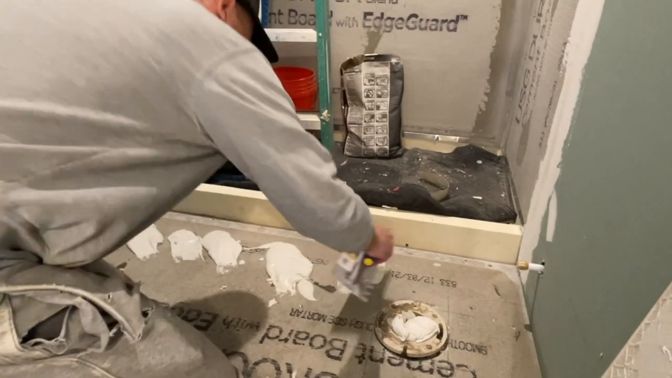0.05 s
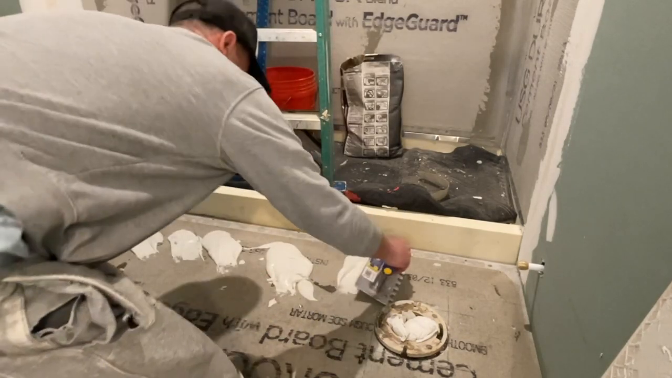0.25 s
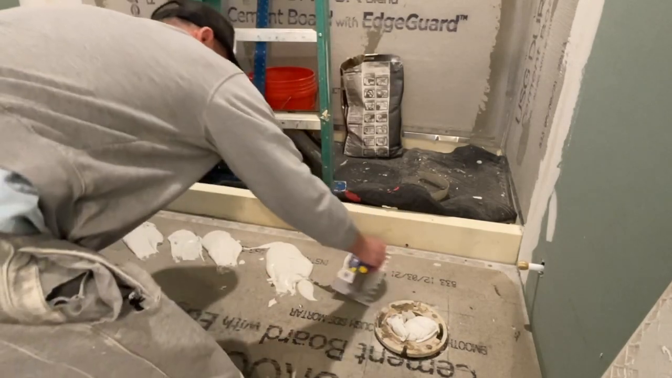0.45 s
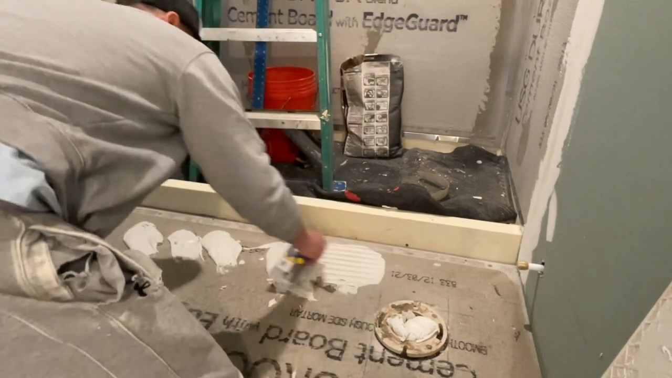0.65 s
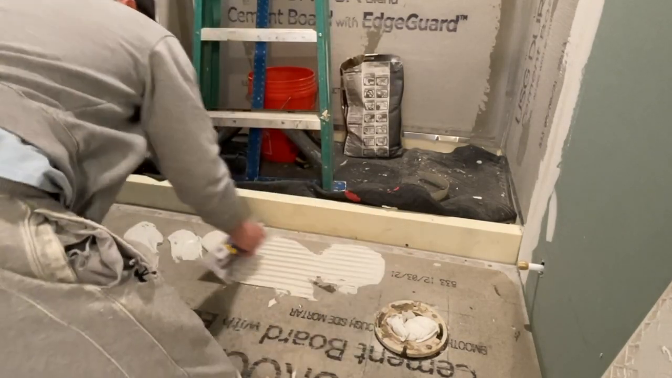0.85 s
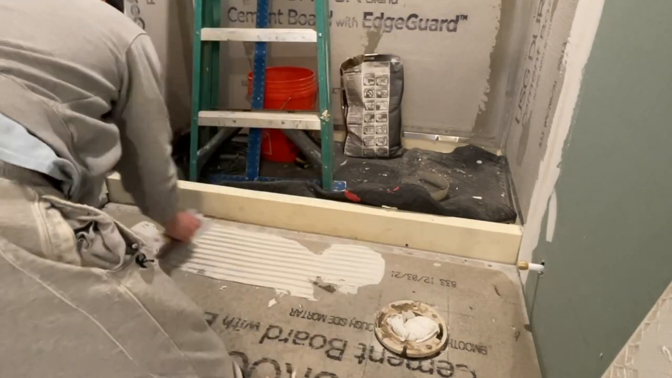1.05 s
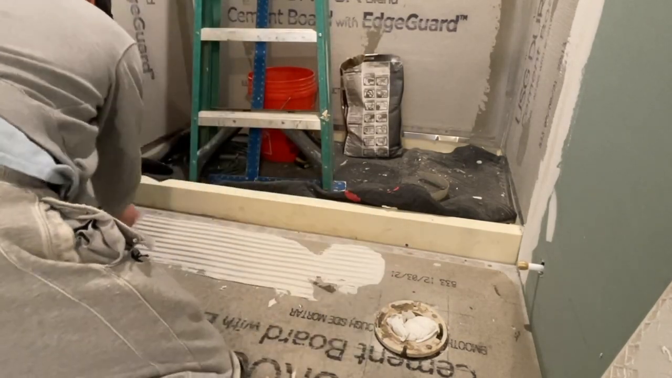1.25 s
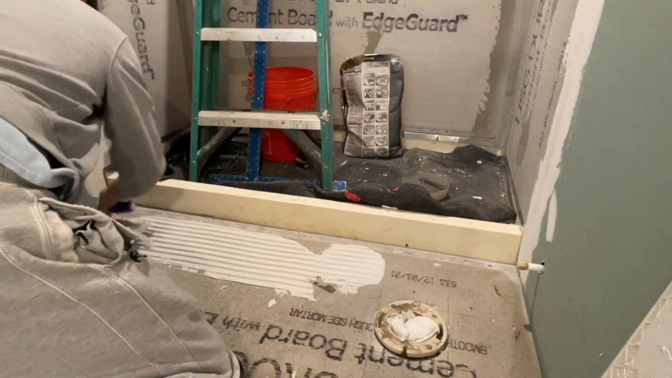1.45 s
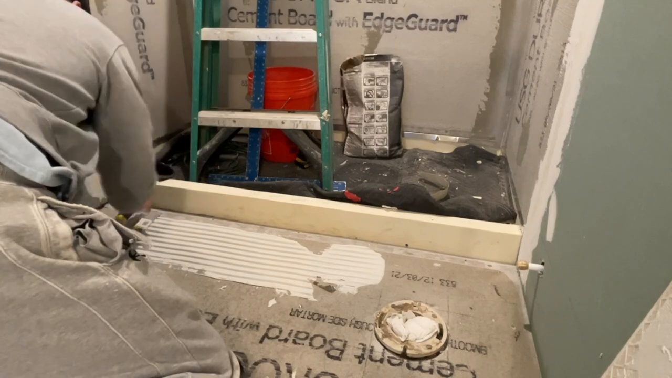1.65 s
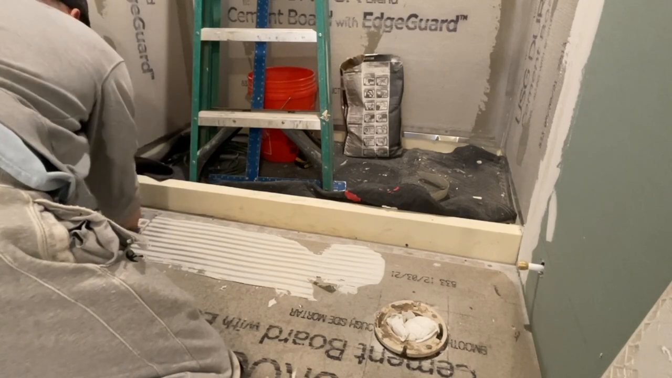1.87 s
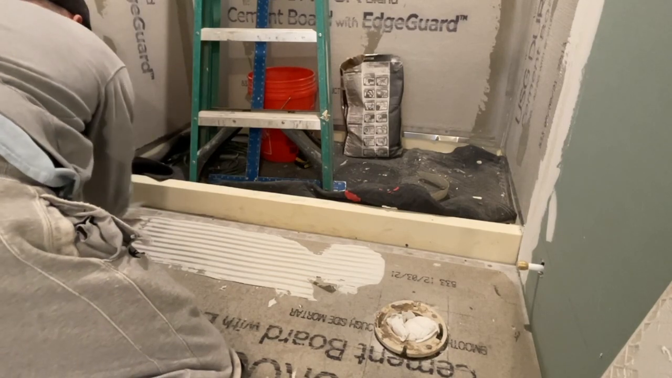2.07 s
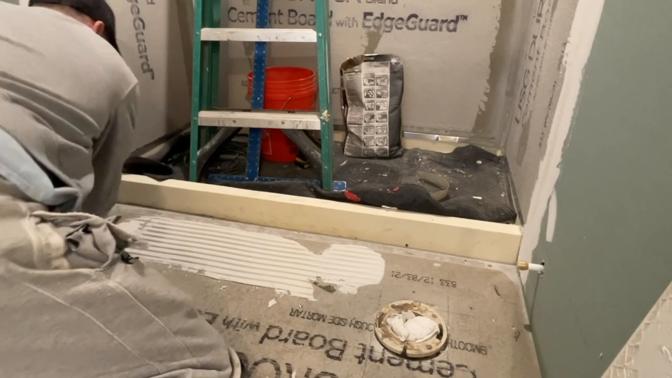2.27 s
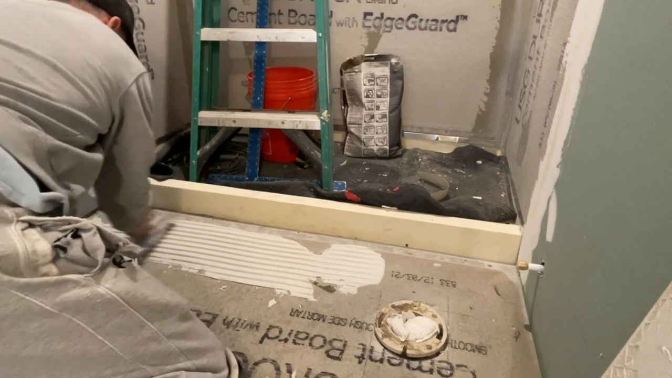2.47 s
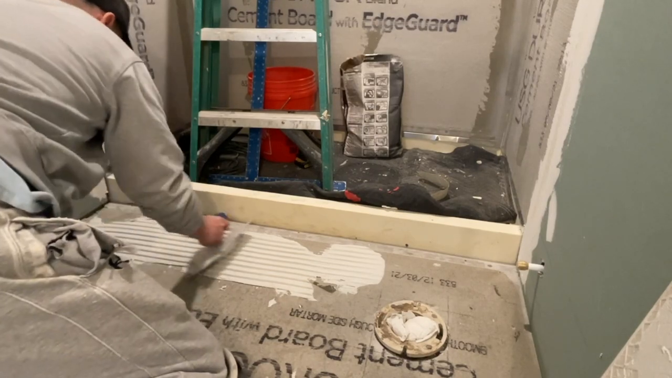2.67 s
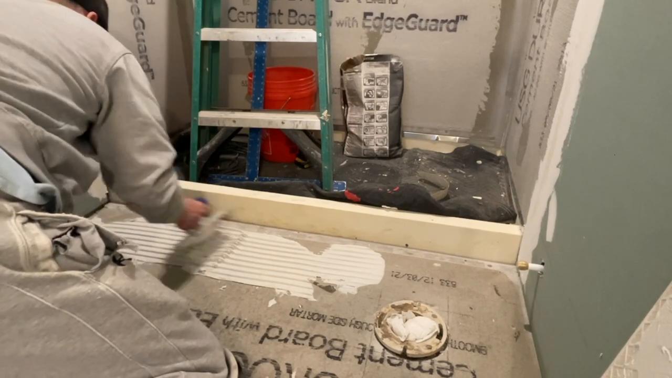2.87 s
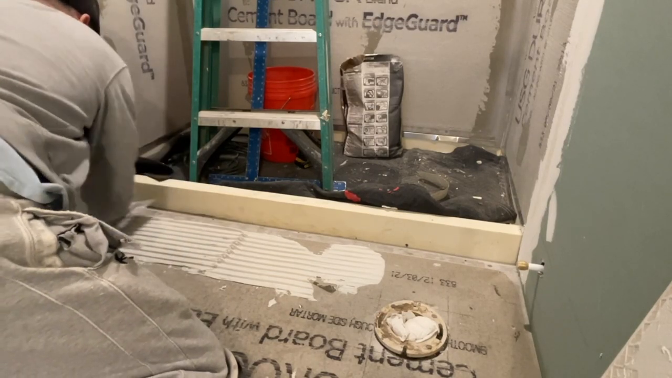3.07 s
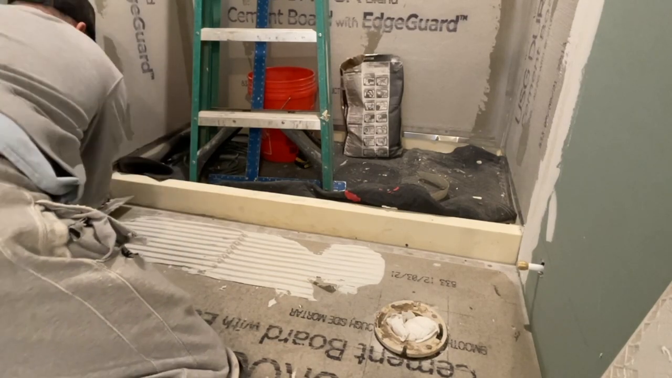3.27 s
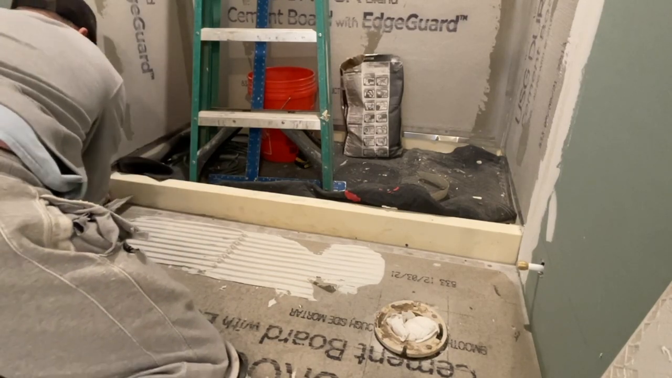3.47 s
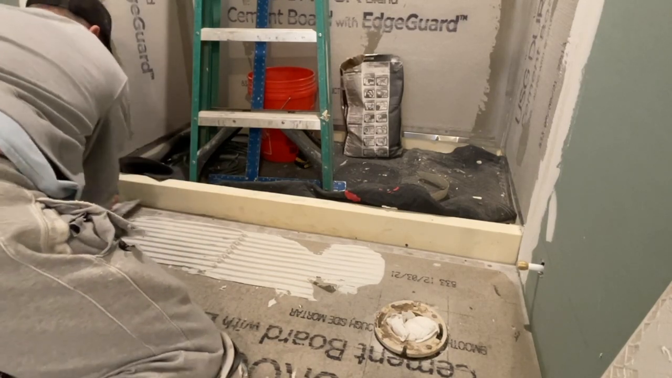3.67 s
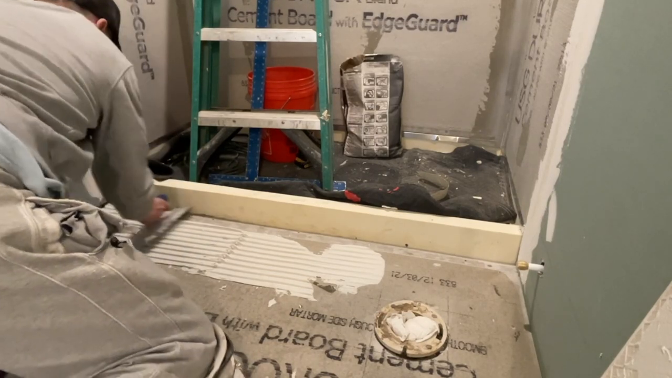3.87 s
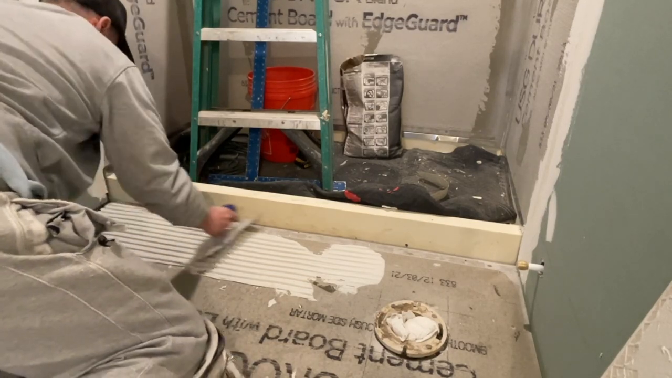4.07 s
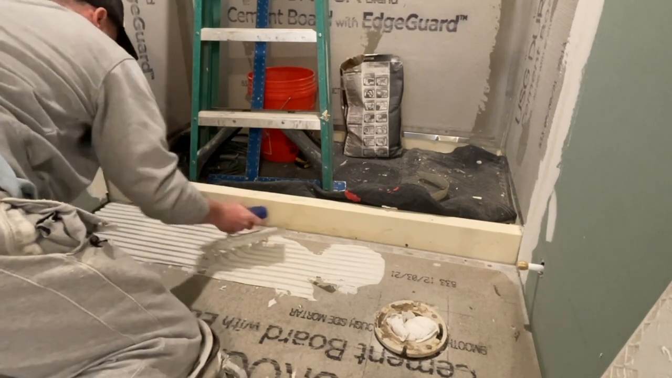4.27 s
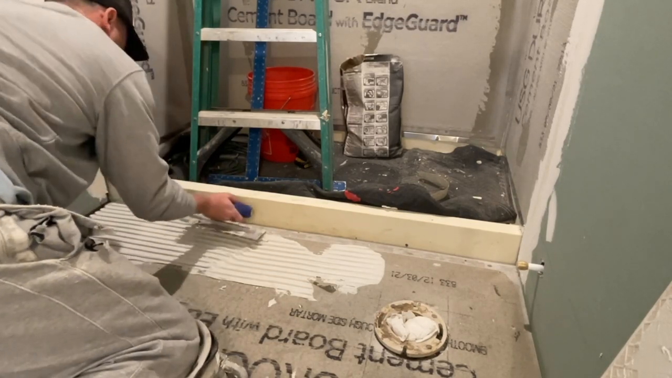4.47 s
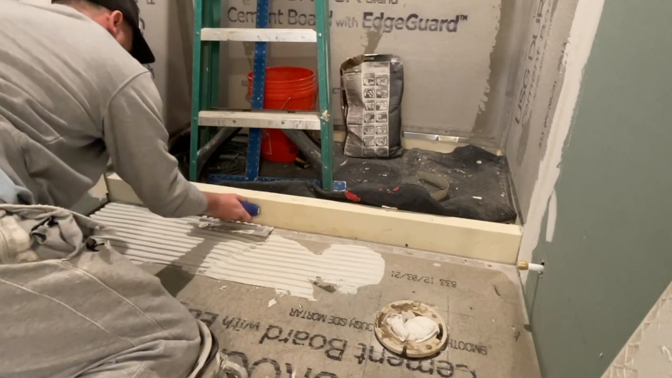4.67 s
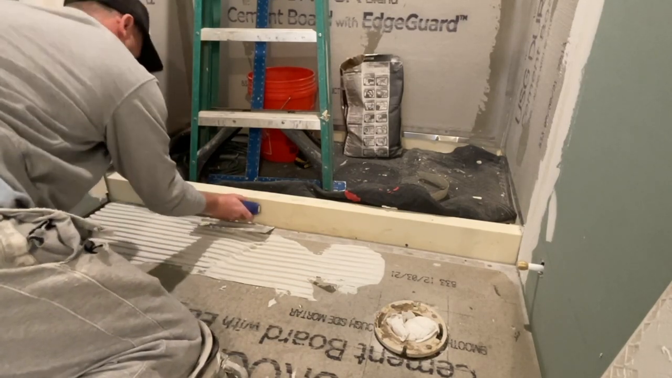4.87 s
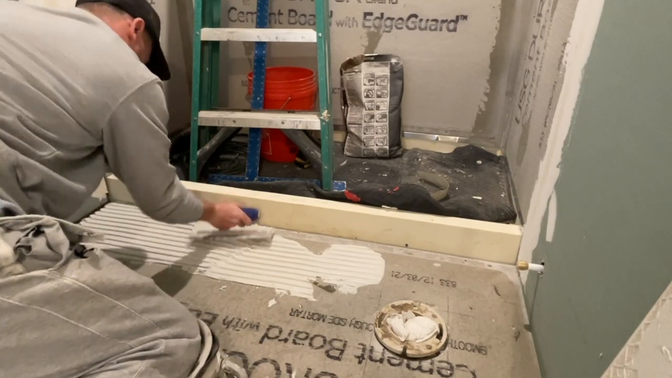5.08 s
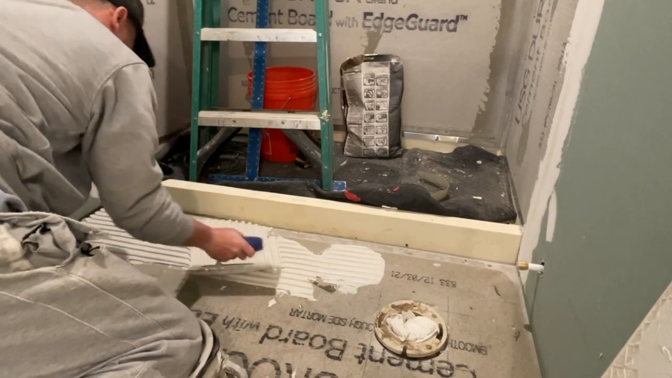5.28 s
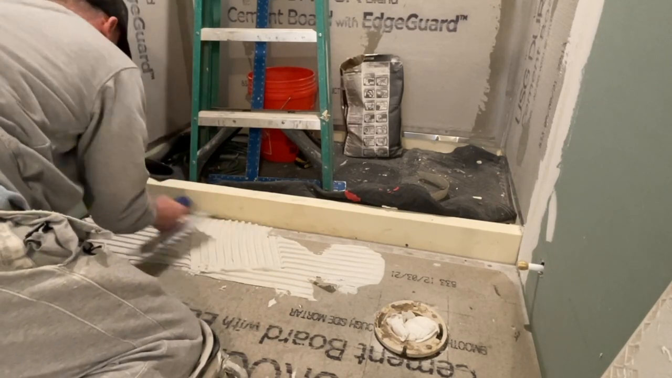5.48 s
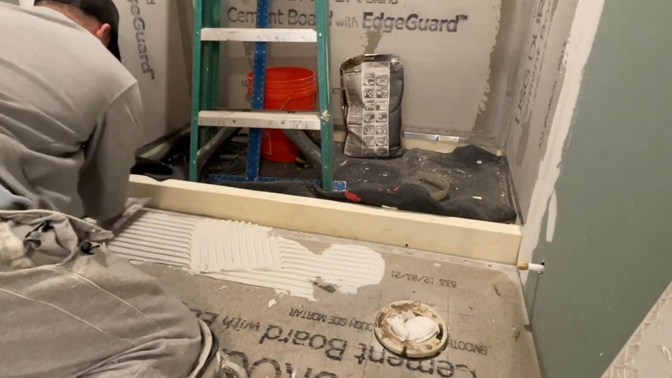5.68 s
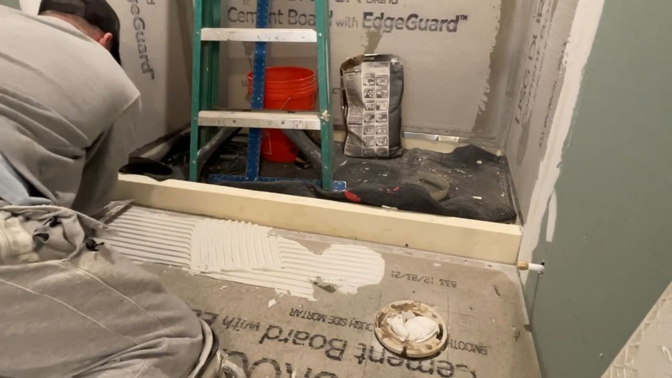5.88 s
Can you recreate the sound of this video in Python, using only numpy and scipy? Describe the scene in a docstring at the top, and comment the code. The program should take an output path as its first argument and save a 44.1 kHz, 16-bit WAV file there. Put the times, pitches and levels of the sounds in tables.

```python
"""In a small bare room, a notched steel trowel combs thick mortar over a cement board floor in five pulls.
Random catches drive the blade's rasp and ring, a bright sandy crunch and the rumble of dragged paste.
Knocks are short bursts through the same filters, thuds are sinking low tones; soft noise swells between.
A floor boom, faint air and a low drone lie beneath; the room adds its echoes."""
import sys
import numpy as np
from scipy import signal
from scipy.fft import rfft, irfft, next_fast_len
from scipy.io import wavfile
from scipy.ndimage import uniform_filter1d

SR = 44100
rng = np.random.default_rng(int(sys.argv[2]) if len(sys.argv) > 2 else 0)


def pcm_store(signal):
    """Save signal as 16-bit PCM."""
    levels = np.round(np.clip(np.atleast_2d(signal), -1, 1) * 32767)
    wavfile.write(sys.argv[1], SR, levels.astype(np.int16).T)


N = 261513
T = np.arange(N) / SR

SPEED_LAW = 0.68  # sand loudness grows as this power of the speed
TIRING_DB_PER_S = 5  # the judder eases once the pull is steady
HEEL_LAG_S = 0.026  # the blade judders on after the teeth have left the sand
SAG_SHARE = 0.031  # the blade's pitch falls by this share over a pull
SAND_CATCH = 0.59  # share of each catch that reaches the sand
SURGE_DB = 0.07  # spread of the judder's short surges
# Pulls of the trowel: (start [s], speeding up [s], steady [s], lifting [s], relative judder level [dB],
# relative sand level [dB], relative paste level [dB], singing pitch [Hz], hollow pitch [Hz],
# hollow level against judder [dB], power of the speed by which judder and paste grow)
PULLS = [(.285, .25, 0.67, 0.072, -22, -22, -36.5, 1300, 681, -11.5, 1),
         (2.26, .35, 0.073, 0.052, -21.5, -21, -35.5, 1350, 630, -14, 0.76),
         (3.565, 0.51, .024, 0.048, -22.5, -20.5, -33.5, 1230, 747, -16, .65),
         (4.966, 0.061, 0.065, 0.064, -38, -34.5, -44.5, 1160, 700, -6, 1.1),
         (5.15, 0.047, .018, 0.056, -29.5, -27, -43, 1257, 705, -11.5, .7)]


def strokes(singing_db=-14, singing_width_hz=210, hollow_width_hz=170, waver=0.028, patchy_db=2.8):
    """The teeth catch and slip; each catch drives blade, sand and paste together during a pull."""
    catch_db = 0.95 * walk(rate=150)
    surge_db = 1.5 * catch_db + SURGE_DB * walk(rate=45)
    judder = unit(steel(grains(rate=2400, spread_db=1.0) * undb(surge_db), ring_db=3.0))
    sand = unit(grit(grains(rate=9000, spread_db=1.5) * undb(SAND_CATCH * catch_db)))
    paste = unit(mortar(grains(rate=1200, spread_db=0.0) * undb(catch_db)))
    slips = grains(rate=2400, spread_db=0.5) * undb(catch_db)
    flex = 1 + waver * walk(rate=19)
    patches = undb(patchy_db * walk(rate=18))
    out = heaps(paste) + chatter(slips)
    for (start, rise, hold, lift, judder_db, sand_db, paste_db,
         sing_hz, hollow_hz, hollow_db, bite) in PULLS:
        pull = span(start, start + rise + hold + 4 * lift)
        age = T[pull] - start
        speed = np.clip(age / rise, 0, 1)
        contact = release(age - rise - hold, lift)
        teeth = speed ** SPEED_LAW * contact
        drag = speed ** bite * np.sqrt(contact)
        tiring = undb(-TIRING_DB_PER_S * np.maximum(age - rise, 0))
        heel = speed ** bite * release(age - rise - hold - HEEL_LAG_S, lift) * tiring
        # both bending notes glide together as pressure and paste load the blade
        load = flex[pull] * (1 - SAG_SHARE * np.minimum(age / (rise + hold), 1))
        singing = undb(singing_db) * bending(slips[pull], sing_hz * load, singing_width_hz)
        hollow = undb(hollow_db) * bending(slips[pull], hollow_hz * load, hollow_width_hz)
        blade = judder[pull] + patches[pull] * (singing + hollow)
        out[pull] += heel * undb(judder_db) * blade
        out[pull] += teeth * undb(sand_db) * sand[pull]
        out[pull] += drag * undb(paste_db) * paste[pull]
    return out


# The broad rasp of the blade: (frequency [Hz], relative level [dB])
RASP = [(200, -35.5), (420, -7), (620, 3.5), (800, -1), (1000, 2), (1600, 2.5), (2400, -7.5), (3500, -11.5),
        (6000, -32.5)]
# Blade notes, damped by paste: (frequency [Hz], width [Hz], relative level [dB])
BLADE_NOTES = [(720, 380, -8.5), (917, 69, -9), (1160, 180, -0.5), (1393, 36, -4.5), (1610, 200, -9.5),
               (1790, 290, -3.5), (2170, 290, -11.5)]


def steel(push, ring_db=8):
    """The blade's voice: a broad rasp and its bending resonances."""
    return colour(push, RASP) + undb(ring_db) * ring(push, BLADE_NOTES)


# Bright crunch as picked up, with dips near 5.6, 7.5 and 10.7 kHz: (frequency [Hz], relative level [dB])
PICKED_UP_CRUNCH = [(800, -18.5), (2000, -13.5), (3600, 0), (5100, 0), (5600, -7), (6050, 0.5), (6950, -1),
                    (7450, -7.5), (8100, -1.5), (9200, -1), (10700, -7), (11800, 1.5), (13200, 2),
                    (15500, -9.5)]
# High rings of the steel teeth: (frequency [Hz], width [Hz], relative level [dB])
TOOTH_NOTES = [(3340, 210, -6), (3920, 550, -2.5), (7050, 79, -7), (8080, 240, -4.5), (13800, 44, 0)]


def grit(push, ring_db=-3):
    """A bright crunch as picked up, with the teeth ringing in it."""
    return colour(push, PICKED_UP_CRUNCH) + undb(ring_db) * ring(push, TOOTH_NOTES)


# The low rumble of paste on the board: (frequency [Hz], relative level [dB])
PASTE_RUMBLE = [(30, -35), (55, -19.5), (75, -1), (105, -11), (160, 3.5), (215, -3), (272, 4), (330, -5),
                (400, 0.5), (600, -4.5), (900, -1), (1800, -31)]


def mortar(push):
    """Pushed paste rumbles in the board: a filter that favours the low range."""
    return colour(push, PASTE_RUMBLE)


# Heaps of paste in the way: (time [s], bell width [s], relative level [dB])
PASTE_HEAPS = [(0.498, 0.014, -37), (0.805, 0.066, -35), (1.226, 0.048, -31), (2.472, 0.031, -45.5),
               (2.685, 0.026, -42.5), (3.554, 0.086, -48), (3.873, 0.039, -33), (3.972, .016, -36.5),
               (5.229, 0.01, -41.5)]


def heaps(paste):
    """The teeth plough through heaps of paste: brief swells of the rumble."""
    return paste * sum(undb(db) * swell(s, width) for s, width, db in PASTE_HEAPS)


# Moments when the blade chatters and sings out:
# (time [s], bell width [s], relative level [dB], pitch [Hz], pitch width [Hz])
FLARES = [(0.38, .03, -34, 1292, 70.5), (0.505, .014, -30, 610, 152.4), (0.565, 0.027, -23, 1350, 332),
          (0.614, 0.018, -23, 1297, 90.8), (0.724, 0.032, -25.5, 492, 108.5), (0.815, .014, -23, 1713, 893),
          (0.816, .04, -29, 411, 136.5), (0.885, 0.019, -29, 750, 399), (0.888, 0.035, -22, 1196, 318),
          (0.945, 0.018, -26, 1237, 300), (1.223, 0.046, -31.5, 1290, 502),
          (2.402, 0.012, -29.5, 596, 140.6), (2.442, 0.022, -33.5, 1410, 500),
          (2.463, .012, -29.5, 600, 140), (2.552, 0.034, -30.5, 1280, 348), (2.617, 0.033, -31, 1740, 900),
          (2.628, .016, -25, 570, 80.5), (2.706, .018, -21.5, 1190, 224.6), (3.599, 0.011, -34, 563, 295.6),
          (3.713, 0.013, -30.5, 1194, 220), (3.868, 0.024, -25.5, 750, 800), (3.886, .06, -32.5, 1800, 900),
          (3.964, 0.011, -29.5, 620, 300), (4.07, 0.015, -23.5, 1190, 342),
          (4.136, 0.017, -22.5, 1750, 1000), (4.132, .02, -25, 740, 220), (4.148, 0.011, -27, 1180, 300),
          (5.067, 0.025, -40.5, 590, 500), (5.09, 0.021, -39.5, 1164, 348), (5.192, .051, -36.5, 3780, 530),
          (5.23, 0.022, -33.5, 1178, 300)]


def chatter(slips):
    """Short flares of the blade's bending notes, from a narrow note to a broad rasp."""
    out = np.zeros(N)
    for s, width, db, hz, width_hz in FLARES:
        near = span(s - 3 * width, s + 3 * width)
        note = bending(slips[near], np.full(len(T[near]), hz), width_hz)
        out[near] += undb(db) * swell(s, width)[near] * note
    return out


def bending(push, hz, width_hz):
    """A resonance whose pitch follows the flex of the blade."""
    turn = np.exp(2j * np.pi * np.cumsum(hz) / SR)
    # shift the pitch down to zero, keep a narrow band, then shift it back
    narrow = signal.butter(2, width_hz / 2, fs=SR, output="sos")
    return unit(np.real(turn * signal.sosfilt(narrow, push / turn)))


# A blade that lands hard rocks in the paste: each contact comes later, weaker and duller
ROCK_S, ROCK_SLOWING = .0068, 1.55  # first delay; power by which the delays grow
ROCK_LOSS_DB, ROCK_DULLING_DB = 1, 0.5  # per contact
# The blade knocks on the board:
# (time [s], relative level [dB], sharpness [dB], singing [dB], how long it may rock on [s])
BLADE_KNOCKS = [(0.199, -26, 5.5, -10, 0.0063), (0.2117, -16.5, 1.5, 3.5, .04), (0.23, -30, -4.5, 9.5, 0),
                (0.262, -31, -4, 8.5, 0), (2.206, -39, 3.5, -18, 0.027), (2.219, -26.5, 3.5, -13, .07),
                (3.433, -53.5, 4.5, -7, 0.006), (3.578, -40, -4.5, -15, 0), (4.607, -57, 2.5, -18.5, .01),
                (4.714, -55.5, 11, -18, 0.0072), (4.888, -48, -2.5, -5, 0.0076), (5.762, -56.5, 3, -12, 0)]


def knocks(crunch_s=0.0046, crack_s=0.0011, count=5):
    """Each knock crushes a little sand and rings the blade, which sings when it is free of paste."""
    push, crack, free = np.zeros((3, N))
    age = np.arange(SR // 20) / SR
    delays = ROCK_S * np.arange(count) ** ROCK_SLOWING
    for s, db, sharp_db, sing_db, rocking in BLADE_KNOCKS:
        for k, delay in enumerate(delays[delays <= abs(rocking)]):
            at = int((s + delay) * SR) + np.arange(len(age))
            size = undb(db - k * ROCK_LOSS_DB)
            blow = size * np.exp(-age / crunch_s)
            push[at] += blow
            free[at] += blow * undb(sing_db)
            crack[at] += size * undb(sharp_db - k * ROCK_DULLING_DB) * np.exp(-age / crack_s)
    push, crack, free = (force * rng.standard_normal(N) for force in (push, crack, free))
    body = undb(6.0) * steel(push, ring_db=2.5) + undb(12.5) * mortar(push)
    note = undb(26.0) * sing(free) + ring(free, [(706, 160, 14), (900, 110, 19), (3640, 160, 9.6)])
    return body + note + undb(4.5) * grit(crack)


# The free blade's main bending notes: (frequency [Hz], width [Hz], relative level [dB])
FREE_NOTES = [(1199, 58, 1.5), (1295, 70, -3), (1380, 27, -13.5)]


def sing(push):
    """The narrow metallic note of the free blade."""
    return ring(ring(push, FREE_NOTES), [(1270, 190, 0.0087)])


def after_ring(hz=1357, db=-64, t60=2.2):
    """A faint, fading steel note hangs in the air until the second knock."""
    return np.sin(2 * np.pi * hz * T) * undb(db - 60 * T / t60) * (T < BLADE_KNOCKS[1][0])


SNAP_ROOM_DB = -4  # how much of a snap is sent to the room
# A single grain of sand snaps under a tooth: (time [s], relative level [dB])
GRAIN_SNAPS = [(4.943, -33)]


def snaps(decay_s=.0012, low_hz=6000):
    """A grain breaks with a tiny, very bright crack: a short noise burst with the lows removed."""
    burst = sum(undb(db) * (T >= s) * np.exp(-abs(T - s) / decay_s) for s, db in GRAIN_SNAPS)
    bright = signal.butter(2, low_hz, "high", fs=SR, output="sos")
    return signal.sosfilt(bright, burst * rng.standard_normal(N))


# Soft thuds of paste and board:
# (time [s], relative level [dB], starting pitch [Hz], time to fade by 60 dB [s])
SOFT_THUDS = [(0.216, -25, 135, 0.14), (0.218, -25.5, 80.5, 0.2), (0.275, -28, 71, 0.31),
              (0.367, -33.5, 66, 0.24), (0.793, -31, 150, 0.077), (0.856, -26, 140, 0.16),
              (0.931, -31.5, 135, .14), (1.025, -29.5, 120, 0.12), (1.1, -29.5, 150, 0.16),
              (1.187, -27, 165, 0.12), (1.374, -27, 161.4, 0.2), (1.427, -32, 115, 0.11),
              (1.89, -42.5, 154.6, 0.25), (2.224, -32, 112, 0.15), (2.25, -35, 69.2, 0.36),
              (2.631, -30, 142.5, 0.12), (3.44, -41, 168.9, 0.13), (3.443, -44, 82, 0.27),
              (3.64, -35.5, 86, .25), (3.8, -28, 161.5, .2), (3.95, -37, 88, 0.24), (4.611, -44, 59, 0.092),
              (5.03, -48, 85, 0.33), (5.109, -46.5, 91, 0.33), (5.17, -33.5, 166, 0.51),
              (5.377, -36.5, 136, 0.082), (5.407, -29.5, 112, 0.048)]


def thuds(rise_s=0.0067, sag=0.32):
    """Low damped swings whose pitch sags as the pressure lets go; the paste makes them uneven."""
    out = np.zeros(N)
    t = np.arange(SR // 2) / SR
    for s, db, hz, t60 in SOFT_THUDS:
        tone = np.sin(2 * np.pi * hz * t * (1 - sag * t / 2))
        swing = tone * (1 - np.exp(-t / rise_s)) * undb(db - 60 * t / t60)
        start = int(s * SR)
        out[start:start + len(t)] += swing[:N - start]
    return out * undb(2.2 * walk(rate=120))


# Faint soft noise swells, some of them long and background-like:
# (time [s], relative level [dB], bell width [s], treble against dull part [dB])
FAINT_SWELLS = [(0.042, -68, 0.41, -0.5), (1.574, -63, 0.052, -10), (1.697, -62, 0.037, -16),
                (1.835, -68, 0.056, -7), (1.864, -83, 0.043, 13), (2.055, -72.5, 0.034, 3.5),
                (2.205, -53.5, 0.017, -10), (3.157, -67, 0.45, -5.5), (3.487, -48.5, 0.024, -3.5),
                (4.294, -46, 0.033, -23), (4.643, -70.5, 0.04, -5), (4.748, -56.5, 0.024, -2.5),
                (4.935, -54, 0.052, 6), (5.47, -68, 0.019, -2), (5.55, -76, 0.11, -16),
                (5.798, -71, 0.019, -0.5)]


def soft_swells(uneven_db=2.5):
    """Faint, uneven swells of noise, each mixed from a dull and a bright part."""
    dull = unit(steel(grains(rate=3300, spread_db=2.0), ring_db=-0.5))
    bright = unit(grit(grains(rate=2000, spread_db=1.0)))
    unevenness = undb(uneven_db * walk(rate=13))
    return unevenness * sum(undb(db) * swell(s, width) * (dull + undb(treble_db) * bright)
                            for s, db, width, treble_db in FAINT_SWELLS)


SHIFT_DB, SHIFT_S = -63, 0.15  # level, and bell width of each shift
# The floor's boom: (frequency [Hz], width [Hz], relative level [dB])
FLOOR_BOOM = [(77.6, 18, 0)]


def floor_rumble():
    """The floor booms faintly as weight shifts around the start and end of each pull."""
    shifts = sum(swell(start, SHIFT_S) + swell(start + rise + hold + SHIFT_S, SHIFT_S)
                 for start, rise, hold, *_ in PULLS)
    boom = unit(ring(ring(rng.standard_normal(N), FLOOR_BOOM), FLOOR_BOOM))
    return undb(SHIFT_DB) * np.minimum(shifts, 1) * boom


QUIET_DB = -68.5  # middle level of each part of the air
# The tone of the quiet indoor air: (frequency [Hz], relative level [dB])
AIR = [(15, -30), (25, -5), (75, 0.5), (267, 2), (368, -10), (552, -2), (1410, -12), (2700, -24),
       (5580, -24), (6050, -24), (7500, -29.5), (8580, -31.5), (10100, -34), (13200, -22), (15500, -48)]
# The drone comes and goes: (time [s], level [dB])
DRONE_LEVEL = [(0, -67), (1.6, -53.5), (1.85, -59), (2, -75.5), (2.12, -58), (3.3, -62), (4.55, -75),
               (5.2, -72), (5.55, -66), (5.93, -68.5)]


def background(drone_hz=360, drone_width_hz=90, follow=0.58):
    """A faint drone of narrow noise; indoor air, partly shared by both sides, swells a little with it."""
    drone_db = np.interp(T, *np.transpose(DRONE_LEVEL))
    air = np.array([unit(colour(rng.standard_normal(N), AIR)) * undb(1.5 * walk(rate=5))
                    for _ in range(3)])
    band = [(drone_hz, drone_width_hz, 0)]
    drone = np.array([unit(ring(ring(rng.standard_normal(N), band), band)) for _ in range(2)])
    air_db = QUIET_DB + follow * (drone_db - drone_db.mean())
    return undb(air_db) * (air[2] + air[:2]) + undb(drone_db) * drone


ROOM_DB, EARLY_DB, EARLY_S = 1, 8.5, 0.0077  # tail and early echo strength; early echo fading time
PORT_LAG = 19  # samples by which the right side hears the direct sound later
# How long the room rings: (frequency [Hz], time to fade by 60 dB [s])
ROOM_FADE = [(100, 0.22), (400, 0.53), (1200, 0.47), (4000, 0.38), (8000, 0.32), (15000, 0.13)]
# Where the trowel is along the floor: (time [s], place from 0 to 1)
TRAVEL = [(0, 0), (.4, 0), (1.3, 1), (2.2, 1), (2.8, .3), (3.6, 1), (4.2, .2), (5, .1), (5.4, .7)]


def room(x):
    """Direct sound, left first; wall echoes change as the trowel travels; the tail dulls as it dies."""
    t = np.arange(int(SR * .7)) / SR
    hz = np.fft.rfftfreq(len(t), 1 / SR)
    centres = np.transpose(ROOM_FADE)[0]
    bands = [(on_log(list(zip(centres, share)), hz), undb(-60 * t / t60))
             for share, (_, t60) in zip(np.eye(len(ROOM_FADE)), ROOM_FADE)]
    count = 6  # spots along the floor, each with its own echoes
    place = np.interp(T, *np.transpose(TRAVEL)) * (count - 1)
    out = np.zeros((2, N))
    for side in range(2):
        for spot in range(count):
            noise = rfft(rng.standard_normal(len(t)))
            tail = sum(irfft(noise * band, len(t)) * decay for band, decay in bands)
            tail = tail * np.minimum(t / 0.0046, 1)
            early = rng.standard_normal(len(t)) * (rng.random(len(t)) < .06)
            early = early * np.exp(-t / EARLY_S) * (t > .001)
            response = undb(ROOM_DB) * tail / np.linalg.norm(tail)
            response += undb(EARLY_DB) * early / np.linalg.norm(early)
            response[side * PORT_LAG] += undb(-3.5)  # the direct sound
            nearness = np.sqrt(np.maximum(1 - abs(place - spot), 0))
            out[side] += signal.oaconvolve(x * nearness, even(response))[:N]
    return out


def even(response):
    """Give a room response about the same power in every 100 Hz, keeping its fine echoes."""
    spectrum = rfft(response, 2 * len(response))
    power = uniform_filter1d(abs(spectrum) ** 2, size=140)
    return irfft(spectrum / np.sqrt(power))[:len(response)]


def grains(rate, spread_db):
    """Random clicks, mostly small with a few large ones."""
    size = undb(spread_db * np.minimum(rng.exponential(size=N), 5))
    return unit((rng.random(N) < rate / SR) * size * rng.choice([-1, 1], N))


def walk(rate):
    """Smooth random wander, spread near 1."""
    k = max(int(SR / rate), 1)
    steps = np.repeat(rng.standard_normal(N // k + 1), k)
    return unit(uniform_filter1d(steps, k)[:N])


def ring(x, modes):
    """Resonances side by side: (frequency [Hz], width [Hz], relative level [dB])."""
    x = x + 1e-18  # keeps the filters from stalling on silence
    return sum(undb(db) * signal.lfilter(*signal.iirpeak(hz, hz / width, SR), x)
               for hz, width, db in modes)


def colour(x, points):
    """Shape the tone by (frequency [Hz], level [dB]) points, with no sound before its cause."""
    size = 4096
    cepstrum = irfft(np.log(undb(on_log(points, np.fft.rfftfreq(size, 1 / SR)))))
    # folding the second half onto the first puts the response after its cause
    cepstrum[1:size // 2] *= 2
    cepstrum[size // 2 + 1:] = 0
    return signal.oaconvolve(x, irfft(np.exp(rfft(cepstrum))))[:len(x)]


def on_log(points, hz):
    """Read (frequency [Hz], value) points on a log-frequency axis."""
    f, value = np.transpose(points)
    return np.interp(np.log(hz + 1), np.log(f), value)


def swell(s, width):
    """A bell-shaped rise and fall around a moment."""
    bell, near = np.zeros(N), span(s - 4 * width, s + 4 * width)
    bell[near] = np.exp(-.5 * ((T[near] - s) / width) ** 2)
    return bell


def release(age, length):
    """Full until age zero, then a smooth bell-shaped fall."""
    return np.exp(-(np.maximum(age, 0) / length) ** 2)


def span(t0, t1):
    """The samples between two moments."""
    return slice(max(int(t0 * SR), 0), int(t1 * SR))


def undb(db):
    """Decibels to gain."""
    return np.exp(np.asarray(db) * (np.log(10) / 20))


def unit(x):
    """Scale to an rms (average strength) of 1."""
    return x / np.sqrt(np.mean(x ** 2))


def scene():
    """The trowel in the room, over the low thuds of the floor and the quiet background."""
    snap = snaps()
    in_room = strokes() + soft_swells() + knocks() + undb(SNAP_ROOM_DB) * snap
    close = snap + thuds() + floor_rumble() + after_ring()  # these reach both sides alike
    return undb(1.0) * room(in_room) + close + background()


TOP_HZ = 15800  # the steep top cut
# How wide the stereo is: (frequency [Hz], level of the side signal [dB])
STEREO_WIDTH = [(60, -15.5), (130, -23.5), (250, -3.5), (1000, 3), (4000, 0), (9600, 0), (10700, 11),
                (11300, -36)]
# Which side is louder: (frequency [Hz], left minus right [dB])
SIDE_LEAN = [(300, -3), (550, 2.5), (1200, 2), (2200, 1.5), (4000, 3), (6500, 5.5), (8300, 5), (9500, -1),
             (11000, -3)]


def record(dry):
    """Stereo shaping: narrow in bass and top treble, mostly leaning left between, with a top cut."""
    size = 2 * next_fast_len(N // 2 + SR // 10)
    hz = np.fft.rfftfreq(size, 1 / SR)
    left, right = rfft(dry, size)
    mid = (left + right) / 2
    side = (left - right) / 2 * undb(on_log(STEREO_WIDTH, hz))
    lean = undb(on_log(SIDE_LEAN, hz) / 2)
    pair = irfft([(mid + side) * lean, (mid - side) / lean])[:, :N]
    return signal.sosfilt(signal.ellip(10, .2, 80, TOP_HZ, fs=SR, output="sos"), pair)


dry = scene()
out = record(dry)
pcm_store(out)
```